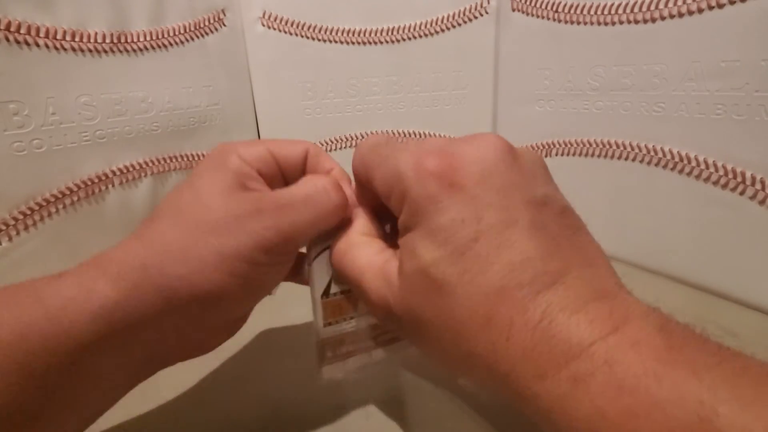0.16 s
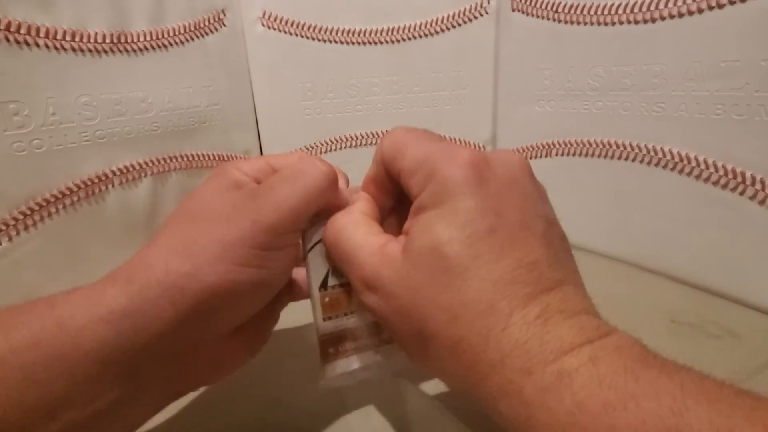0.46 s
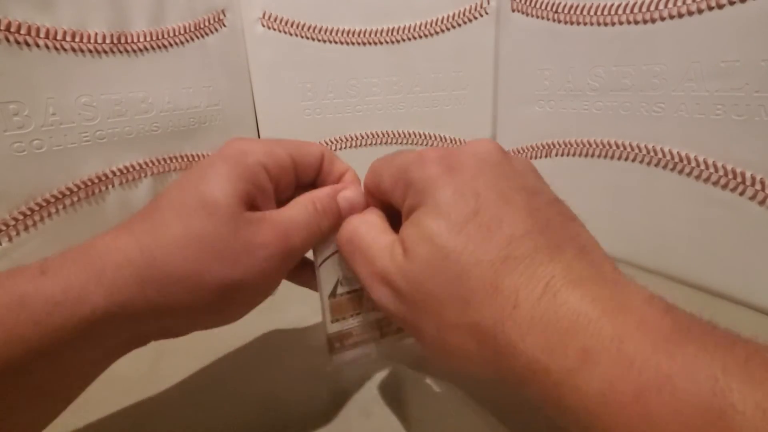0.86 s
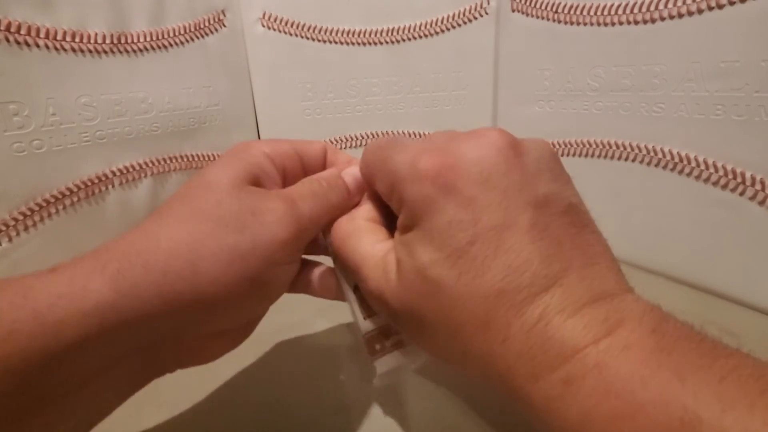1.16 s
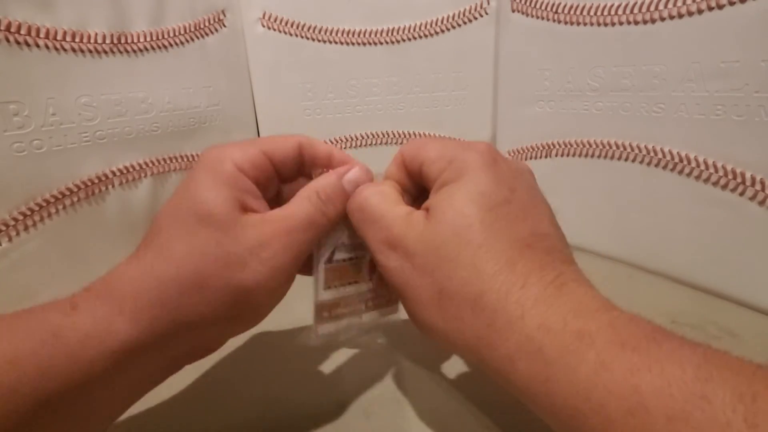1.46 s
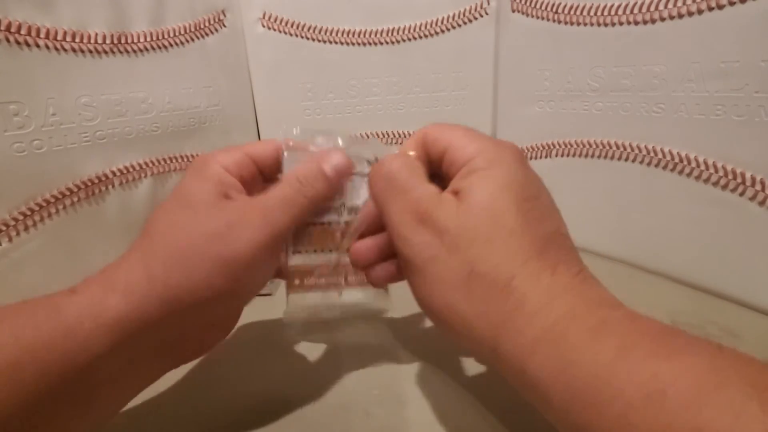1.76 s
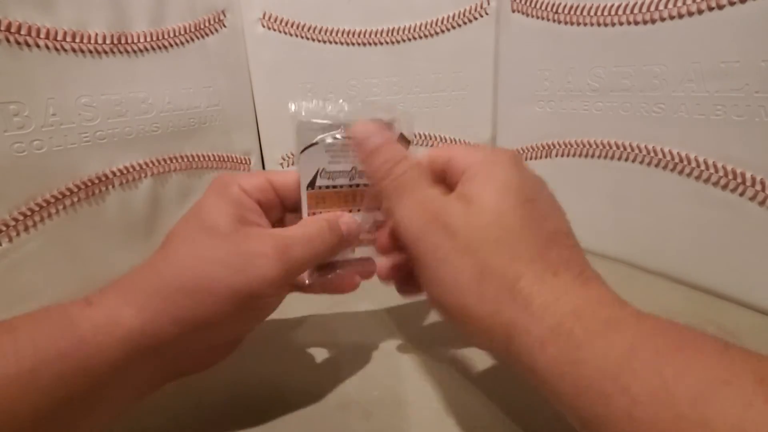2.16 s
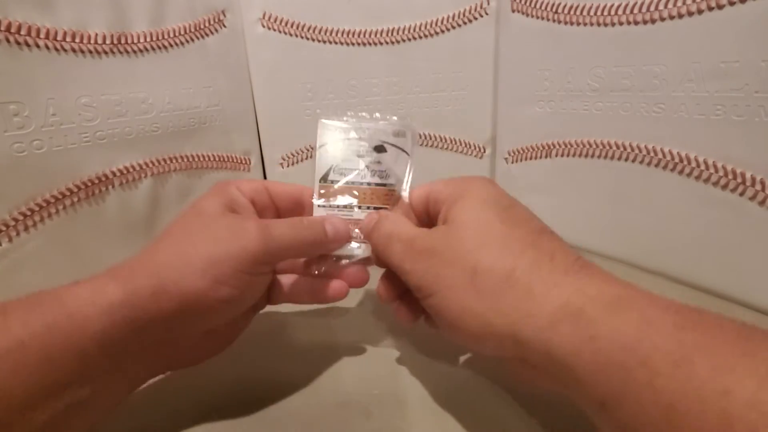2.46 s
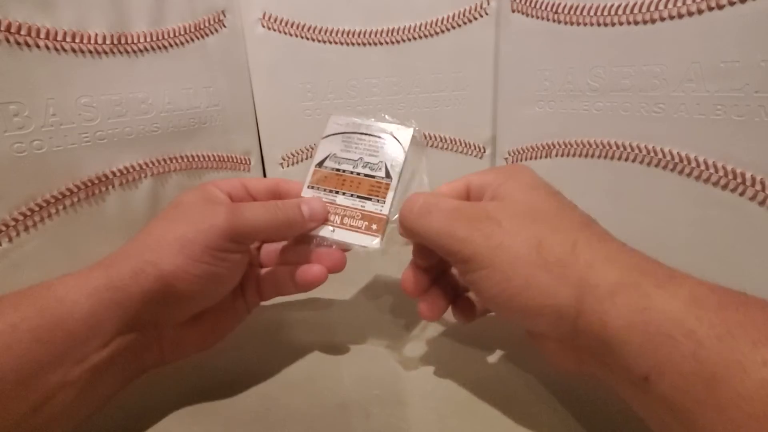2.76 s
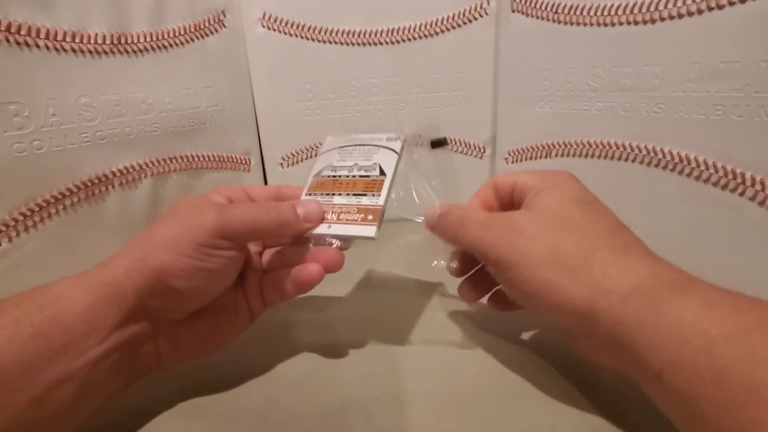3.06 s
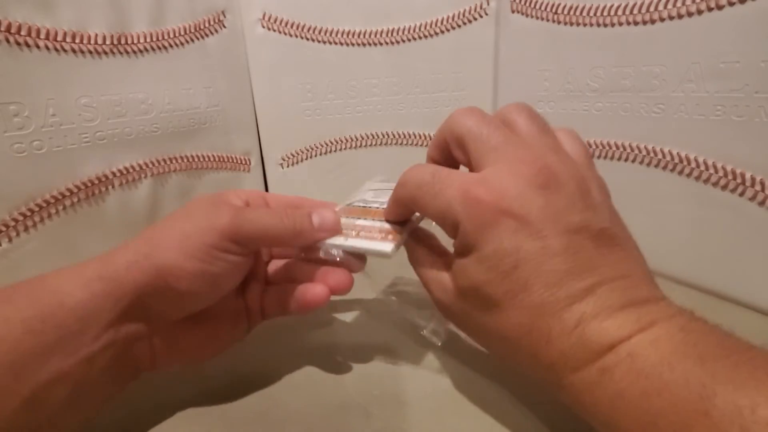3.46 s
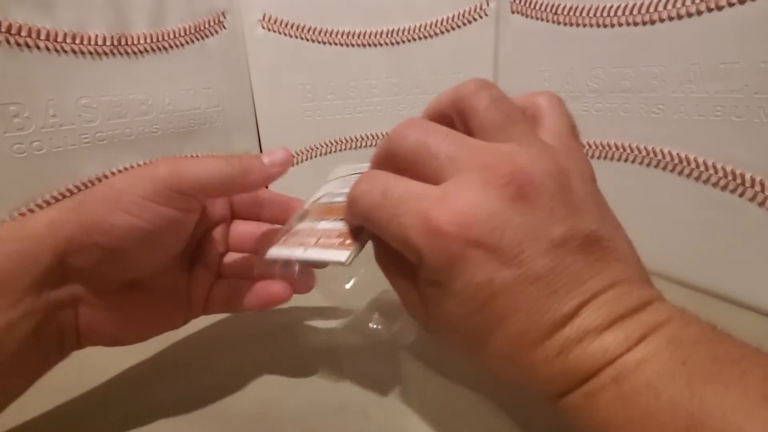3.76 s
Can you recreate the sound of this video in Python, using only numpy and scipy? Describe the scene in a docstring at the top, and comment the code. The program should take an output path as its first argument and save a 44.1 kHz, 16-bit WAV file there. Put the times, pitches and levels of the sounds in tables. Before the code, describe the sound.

Thin plastic wrapper crinkles close to the microphone: sparse dry ticks at first, then sharp snaps and short rips, a stiff card knock, and sparser rustling in a quiet humming room.

```python
"""A faint crinkle over a quiet room hum, then sharp snaps: hands pick at a small cellophane pack close to a
phone, tear it open and pull the film away. Single creases snap as bursts of coloured noise with brief facet
rings; tearing runs them into a dense crackle of random releases. The stiff cards inside thump as decaying
modes, wrists bump the table as swells of low noise, and the room is steady shaped noise."""
import sys
import numpy as np
from scipy import signal
from scipy.fft import rfft, irfft, next_fast_len
from scipy.io import wavfile
from scipy.ndimage import uniform_filter1d

SR = 44100
rng = np.random.default_rng(int(sys.argv[2]) if len(sys.argv) > 2 else 0)


def persist_wave(psi):
    """Save psi, clipped to +-1, as 16-bit WAV."""
    counts = np.round(np.clip(psi, -1, 1) * 32767).astype(np.int16)
    wavfile.write(sys.argv[1], SR, np.atleast_2d(counts).T)


N = 171990  # samples

LEAN_DB, LEFT_LAG_S = -1.5, .00007  # left level over right; how late the left channel is
EDGES_HZ = (2500, 7500)  # splits the film into low, middle and treble
SHELF_HZ, SHELF_DB, TOP_HZ = 15950, -24, 17100

SNAP_T60_S = (.03, .013, .010)  # low, middle, treble
RISE_S, TAIL_DB, TAIL_T60_S = 0.0005, -14.5, .08  # onset; weak longer tail
SIDE_SCATTER_DB = 2
SNAP_RING_DB, SNAP_CYCLES = -10, 30  # facet rings under the snap; their t60 in cycles

# Single creases let go: [t/s, middle level/dB, treble over middle/dB, low over middle/dB]
CREASE_SNAPS = [(0.0837, -34, 6.5, -47), (0.128, -42, 17, -35), (0.1378, -29, 4, -20),
                (0.1565, -27, 0, -16.5), (0.201, -40.5, 11, -33), (0.2221, -16.5, 4, -36),
                (0.331, -36, 4.5, -39), (0.4014, -29.5, -5.5, -19.5), (0.53, -46, -46, -7.5),
                (0.5852, -24, 6, -29), (0.604, -20, -4, -17), (0.7311, -37.5, 10.5, -26),
                (0.7556, -23, 2.5, -26), (0.8518, -33, 5, -12.5), (0.8653, -25.5, -4, -19),
                (0.9305, -18, -7, -23.5), (0.9621, -24, 1, -23), (1.0182, -40, -3, -39),
                (1.0986, -33, 8, -39), (1.129, -22.5, 5.5, -19.5), (1.1447, -21, 2.5, -15.5),
                (1.1761, -25.5, 6, -20), (1.182, -20.5, 4.5, -18), (1.2002, -27, -0.5, -13),
                (1.277, -25, -1.5, -21.5), (1.3375, -29.5, 7, -34), (1.375, -20, -2, -26),
                (1.3825, -22.5, 2, -18.5), (1.3962, -14, 0, -21), (1.409, -12.5, 1, -33),
                (1.4576, -27, -4, -16), (1.5649, -24.5, -10, -19), (1.635, -27.5, 11, -33),
                (1.6486, -14, -3, -28), (1.654, -22, 5, -27), (1.66, -25, -1, -31),
                (1.6785, -22.5, -1, -39), (1.7367, -41.5, 2, 5.5), (1.7759, -25, -24, -12),
                (1.8328, -31.5, 8.5, -6), (1.8777, -25, -5, -18), (1.9047, -15.5, -2.5, -25),
                (1.911, -27.5, 1, -7.5), (1.935, -16.5, 3, -27), (1.9641, -15.5, 6, -21.5),
                (1.9759, -16.5, -5, -31), (1.9995, -31, 7, -29), (2.055, -35, 9, -14),
                (2.0856, -20.5, 6, -20), (2.15, -31, 9.5, -15), (2.1639, -20, 11, -21.5),
                (2.2869, -20.5, 1, -22), (2.3227, -24, 1.5, -14.5), (2.349, -18.5, 3.5, -14),
                (2.4108, -13.5, 3.5, -22.5), (2.4189, -19.5, -18, -22), (2.4587, -18.5, 2.5, -12),
                (2.5026, -17, 2.5, -42), (2.5434, -22, 7, -15.5), (2.5865, -24, 11, -14.5),
                (2.6309, -22.5, 5.5, -4.5), (2.6552, -24, 13.5, -5), (2.6715, -21, 6, -11),
                (2.6936, -17.5, 2, -12), (2.7012, -17, 1, -17.5), (2.7325, -17, -7, -13.5),
                (2.76, -26.5, 0.5, -14), (2.8448, -28, 5, -18.5), (2.9196, -13.5, -1, -5.5),
                (2.996, -26, 0, -7), (3.0084, -25.5, -3, -11), (3.0442, -17, -7, -13.5),
                (3.0985, -30, -22, -7.5), (3.28, -37.5, 9, -32), (3.4016, -37, -1, -1),
                (3.5687, -16, 2.5, -10), (3.5916, -19, -2, -21.5), (3.8184, -32.5, -4, -18),
                (3.889, -33, -18, -9)]


def snaps():
    """Single creases let go: short noise bursts, each with its own colour and side, plus three facet rings."""
    s, db, high_db, low_db = np.transpose(CREASE_SNAPS)
    side_db = LEAN_DB + SIDE_SCATTER_DB * rng.standard_normal(len(s))
    left_right_db = np.outer([.5, -.5], side_db)
    at = np.round(s * SR).astype(int)
    out = 0
    for band, over_db, t60 in zip(film_bands(), (low_db, 0, high_db), SNAP_T60_S):
        power = np.zeros((2, N))
        power[:, at] = amp(db + over_db + left_right_db) ** 2
        out = out + band * bursts(power, t60, TAIL_DB)
    facets = sum(rings(s + RISE_S, amp(db + SNAP_RING_DB), SNAP_CYCLES) for facet in range(3))
    return out + facets


TEAR_PER_S, TEAR_LOW_DB = 910, -11.5  # mean rate of releases; low band over middle
TEAR_RAMP_S = 0.016  # fade centred on each end of a pull
GRAINS_PER_S, GRAIN_DB, GRAIN_CYCLES = 1800, -5, 9  # ringing ticks; their t60 in cycles

# Pulls on the film: [t/s, length/s, first level/dB, last level/dB, treble over it/dB]
FILM_PULLS = [(0.247, 0.036, -49, -39.5, 8.5), (0.769, 0.04, -43.5, -53, 4.5), (1.387, 0.029, -38, -54, -8),
              (1.576, 0.1, -28.5, -32, 0), (1.697, 0.082, -27, -44.5, 1.5), (1.927, 0.037, -32.5, -29, -2),
              (2.074, 0.064, -48, -40.5, 1.5), (2.174, 0.027, -21.5, -44, -1),
              (2.347, 0.01, -26, -21.5, -4), (2.469, 0.053, -31.5, -32, 4.5), (2.527, 0.048, -34.5, -38, 7),
              (2.588, 0.031, -29, -38, -1.5), (2.626, 0.099, -28.5, -32.5, -1.5),
              (2.856, 0.026, -33, -36, 4), (2.888, 0.055, -27, -37.5, 3), (3.08, 0.06, -44, -46, 2)]


def tearing():
    """The film rips: releases too dense to tell apart, with tiny facet rings, in short pulls."""
    t, gain, treble = np.arange(N) / SR, np.zeros(N), np.zeros(N)
    for s, length, first_db, last_db, over_db in FILM_PULLS:
        to_nearest_end = np.minimum(t - s, s + length - t)
        fade = np.clip(to_nearest_end / TEAR_RAMP_S + .5, 0, 1)
        pull = amp(np.interp(t, [s, s + length], [first_db, last_db])) * fade
        gain = gain + pull
        treble = treble + pull * amp(over_db)
    low, mid, high = film_bands()
    grain = crackle(TEAR_PER_S, spread_db=3.5, smooth=.6, t60=.007)
    when, size = rng.random((int(GRAINS_PER_S * N / SR), 2)).T
    tick_gain = np.log(1 - size) ** 2  # mostly small, a few big
    ticks = unit(rings(when * N / SR, tick_gain, GRAIN_CYCLES))
    rip = grain * (gain * (amp(TEAR_LOW_DB) * low + mid) + treble * high)
    return rip + gain * amp(GRAIN_DB) * ticks


CREASE_PER_S, CREASE_LOW_DB, CREASE_HIGH_DB = 170, -9, -2  # mean rate; bands over the middle
RUB_DB, RUB_FOLLOWS = -62.5, 1  # rub at the mean crease level; share of its dB swings the rub follows

# Level of the small crease ticks and, through its swings, of the dull rub: [t/s, level/dB]
CREASE_LEVEL = [(0, -57.5), (.3, -57), (.48, -65.5), (.7, -50.5), (.98, -59.5), (1.05, -65), (1.25, -52.5),
                (1.8, -45.5), (2.25, -47.5), (2.75, -50.5), (2.81, -53), (3.1, -44.5), (3.17, -67),
                (3.551, -47.5), (3.723, -68), (3.85, -53.5)]


def creases():
    """Small creases tick all the while, random releases on film noise, over a dull rub of low noise."""
    s, db = np.transpose(CREASE_LEVEL)
    level_db = np.interp(np.arange(N) / SR, s, db)
    low, mid, high = film_bands()
    grain = crackle(CREASE_PER_S, spread_db=4, smooth=.7, t60=.015)
    colour = amp(CREASE_LOW_DB) * low + mid + amp(CREASE_HIGH_DB) * high
    rub_db = RUB_DB + RUB_FOLLOWS * (level_db - level_db.mean())
    rub = amp(rub_db) * noise(FILM_COLOUR, 180, 480)
    return amp(level_db) * grain * colour + rub


# Knocks of the cards: [t/s, level/dB]
CARD_KNOCKS = [(0.154, -42), (2.173, -29.5), (2.345, -34), (2.64, -31), (2.681, -33), (2.732, -26.5),
               (2.882, -23.5), (2.895, -21), (2.904, -20), (2.9196, -12), (2.999, -30), (3.131, -32),
               (3.57, -34.5), (3.837, -31)]
# Modes of the stiff cards, before scatter: [f/Hz, level/dB, t60/s]
CARD_MODES = [(282.5, -6.5, 0.054), (359, -2.5, .04), (419, -5, 0.067), (549, -14.5, 0.043),
              (1030, -10, 0.051), (1574, -21, 0.027)]


def thumps():
    """The cards flex and knock: softly started decaying modes, a little different each time."""
    out, t = np.zeros(N + SR), np.arange(SR // 8) / SR
    onset = 1 - np.exp(-t / 0.0025)
    for s, db in CARD_KNOCKS:
        ring = 0
        for hz, level_db, t60 in CARD_MODES:
            decay = amp(level_db + rng.normal(0, 2.1) - 60 * t / t60)
            ring = ring + decay * np.sin(2 * np.pi * hz * (1 + rng.normal(0, 0.037)) * t)
        out[round(s * SR):][:len(t)] += amp(db) * ring * onset
    return out[:N]


# Wrist bumps, each swelling from 0.48 length before t to 1.52 length after: [t/s, length/s, peak level/dB]
WRIST_BUMPS = [(0.158, 0.026, -50), (0.576, 0.19, -57.5), (1.134, 0.059, -50), (1.875, 0.18, -55),
               (2.14, 0.069, -56), (2.28, 0.061, -50), (3.172, 0.065, -56.5)]


def bumps():
    """Wrists bump softly on the table: half-sine swells of noise below 150 Hz."""
    t = np.arange(N) / SR
    swell = 0
    for s, length, db in WRIST_BUMPS:
        phase = np.clip((t - s) / (2 * length) + 0.24, 0, 1)
        swell = swell + amp(db) * np.sin(np.pi * phase)
    return swell * noise(ROOM_COLOUR, 0, 150)


ROOM_DB = -59
# Spectrum of the room's hum and hiss: [f/Hz, relative level/dB per Hz]
ROOM_COLOUR = [(25, -25), (40, -0.5), (60, 2.5), (114, -0.5), (185, -12), (300, -1), (430, -28.5),
               (1050, -24), (2100, -35), (3000, -28), (16000, -29)]


def room():
    """Steady hiss over a low hum, all from one shaped noise."""
    return amp(ROOM_DB) * noise(ROOM_COLOUR)


# Spectrum of the film: [f/Hz, relative level/dB per Hz]
FILM_COLOUR = [(150, -16.5), (430, -3.5), (660, -20), (1075, 1), (1310, -9.5), (1650, -5.5), (2170, -8),
               (2910, -4), (6870, -0.5), (8000, -12), (12000, -8), (15800, -10)]


def film_bands():
    """The film's noise in its low, middle and treble part; the upper two shift in colour."""
    low, high = EDGES_HZ
    return noise(FILM_COLOUR, 0, low), patchy(noise(FILM_COLOUR, low, high)), patchy(noise(FILM_COLOUR, high))


RING_HZ, RING_SPREAD = 4500, .55  # median facet pitch; its scatter in natural-log units


def rings(s, gain, cycles):
    """Small facets of film ring briefly, each at its own pitch and angle to the two channels."""
    pitch, turn = rng.standard_normal((len(s), 2)).T[:, :, None]
    hz = np.clip(RING_HZ * np.exp(RING_SPREAD * pitch), EDGES_HZ[0], SHELF_HZ)
    k = np.arange(256)
    cycle = hz * k / SR
    at = (np.round(s * SR).astype(int)[:, None] + k).ravel()
    decay = amp(along(FILM_COLOUR, hz) - 60 * cycle / cycles)
    size = gain[:, None] * decay * (1 - np.exp(-cycle))

    def channel(side):
        wave = np.sin(2 * np.pi * (cycle - side * hz * LEFT_LAG_S / 2) + side * turn / 2)
        return np.bincount(at, (size * wave).ravel(), N + len(k))[:N]

    return np.array([channel(side) for side in (1, -1)])


def bursts(power, t60, tail_db):
    """Envelope of sudden releases: a fast fall, a weak longer tail, their powers adding up."""
    t = np.arange(SR // 8) / SR
    fall = amp(-60 * t / t60) + amp(tail_db - 60 * t / TAIL_T60_S)
    shape = fall * (1 - np.exp(-t / RISE_S))
    summed = signal.fftconvolve(np.atleast_2d(power), shape[None] ** 2, axes=1)[:, :N]
    return np.sqrt(np.abs(summed))


def crackle(per_s, spread_db, smooth, t60):
    """Envelope of rms 1 from random releases, a few far bigger, over a smooth share."""
    when, size = rng.random((2, N))
    power = (when < per_s / SR) * amp(-2 * spread_db * np.log(np.maximum(size, .02)))
    return unit(unit(bursts(power, t60, tail_db=-20)) + smooth)


PATCH_DB = 4  # rms swing of the patches


def patchy(x):
    """Colour that shifts from moment to moment: random gain in small patches of pitch and time."""
    z = signal.stft(x, nperseg=128)[2]
    field = rng.standard_normal(z.shape[1:])
    field = uniform_filter1d(field, size=3, axis=0)  # across pitch
    field = uniform_filter1d(field, size=8, axis=1)  # across time
    return unit(signal.istft(z * amp(PATCH_DB * unit(field)), nperseg=128)[1][:, :N])


# Likeness of left and right, 1 for the same signal: [f/Hz, correlation]
STEREO_LIKENESS = [(400, 0.92), (680, 0.12), (1100, 1), (2500, 0.15), (6000, 0.4), (14000, 0.13)]


def noise(spectrum, lo=0, hi=SR):
    """Stereo noise of rms 1 in a band, partly alike, the left channel a little late."""
    def mid_side(hz):
        turn = np.arccos(np.clip(along(STEREO_LIKENESS, hz), -1, 1)) / 2
        gain = amp(along(spectrum, hz)) * (hz >= lo) * (hz < hi)
        return gain * np.array([np.cos(turn), np.sin(turn)])

    def lag(hz):
        return np.exp(-1j * np.pi * hz * LEFT_LAG_S * np.array([[1], [-1]]))

    mid, side = filtered(rng.standard_normal((2, N)), mid_side)
    return unit(filtered(np.array([mid + side, mid - side]), lag))


def filtered(x, response):
    """x times a complex response of frequency."""
    m = next_fast_len(N + SR // 4)
    return irfft(rfft(x, m) * response(np.fft.rfftfreq(m, 1 / SR)), m)[..., :N]


def along(points, hz):
    """Values between (f/Hz, value) points on a log frequency axis."""
    f, v = np.transpose(points)
    return np.interp(np.log(hz + 1), np.log(f + 1), v)


def amp(db):
    """Amplitude factor of a level in dB."""
    return 10 ** (np.asarray(db) / 20)


def unit(x):
    """x scaled to rms 1."""
    return x / np.sqrt(np.mean(x ** 2) + 1e-20)


def scene():
    """The film leans to one side; the cards and bumps join it over the room."""
    lean = amp(LEAN_DB * np.array([[.5], [-.5]]))
    return snaps() + lean * (tearing() + creases()) + thumps() + bumps() + room()


def record(dry):
    """A step down at the top, nothing above the band limit."""
    return filtered(dry, lambda hz: np.where(hz < SHELF_HZ, 1, amp(SHELF_DB)) * (hz < TOP_HZ))


dry = scene()
out = record(dry)
persist_wave(out)
```